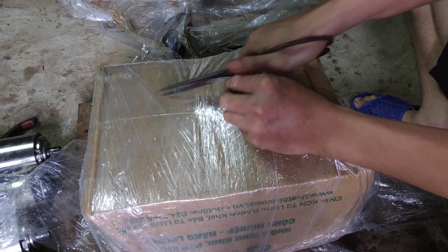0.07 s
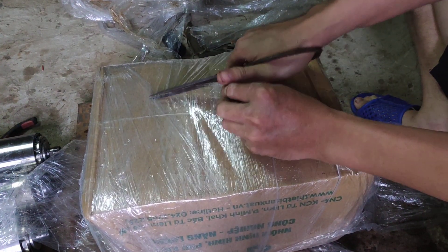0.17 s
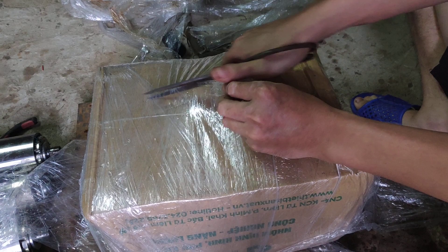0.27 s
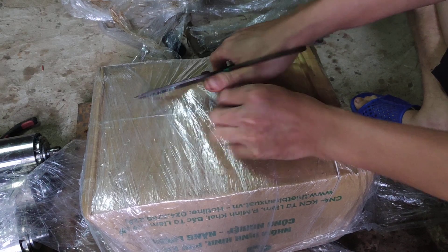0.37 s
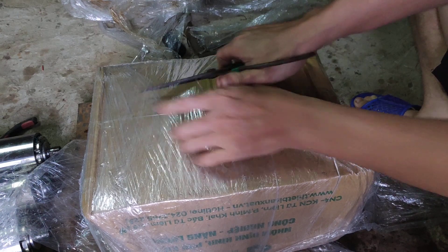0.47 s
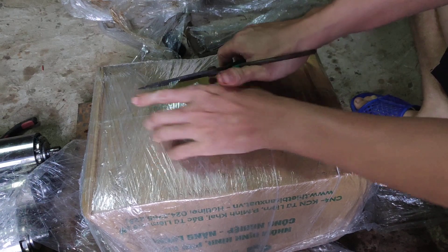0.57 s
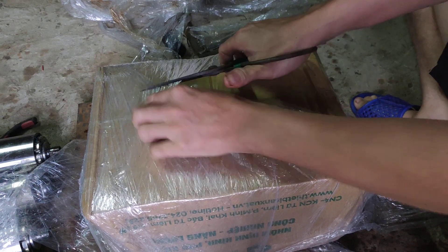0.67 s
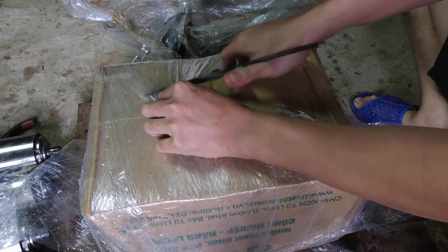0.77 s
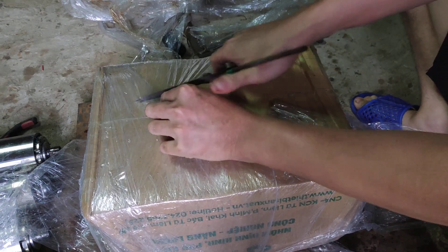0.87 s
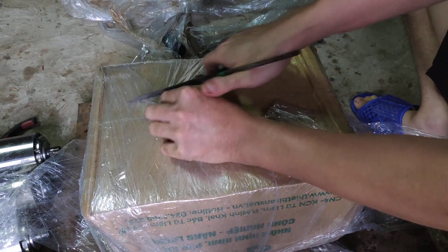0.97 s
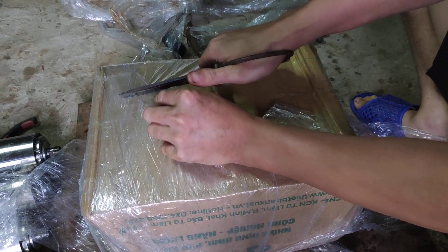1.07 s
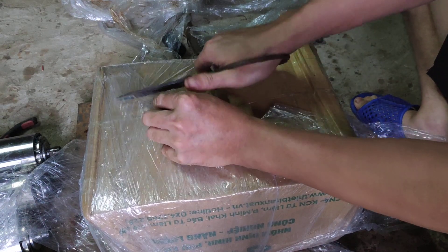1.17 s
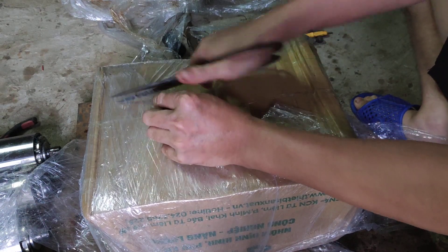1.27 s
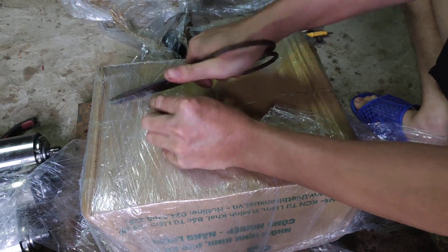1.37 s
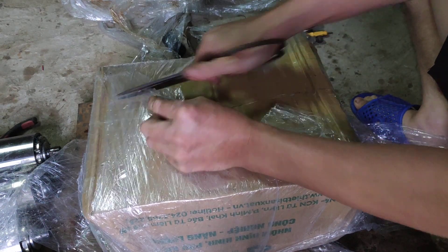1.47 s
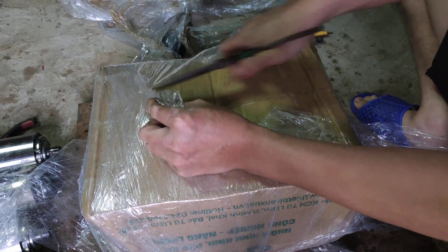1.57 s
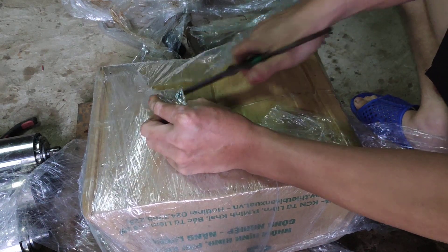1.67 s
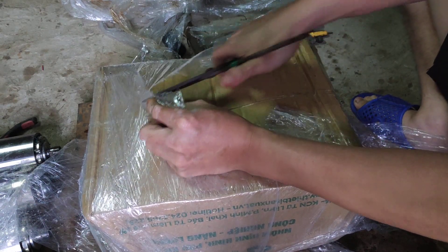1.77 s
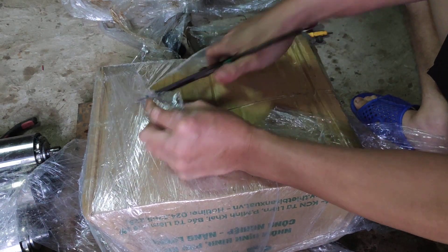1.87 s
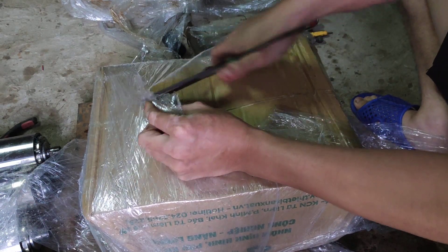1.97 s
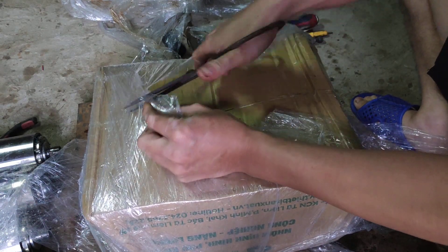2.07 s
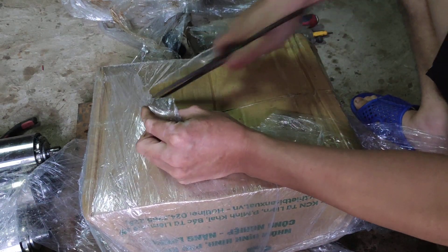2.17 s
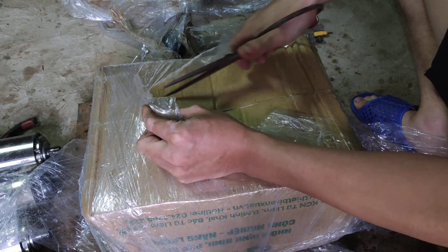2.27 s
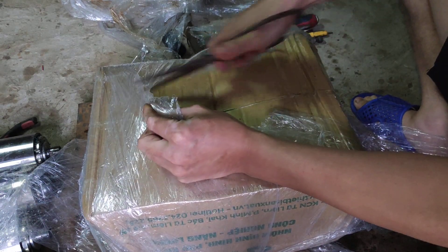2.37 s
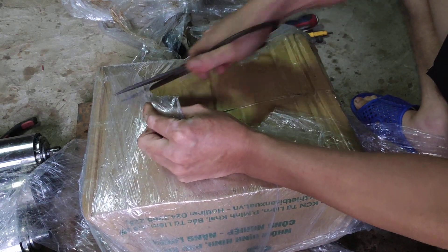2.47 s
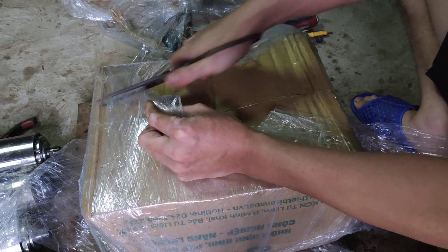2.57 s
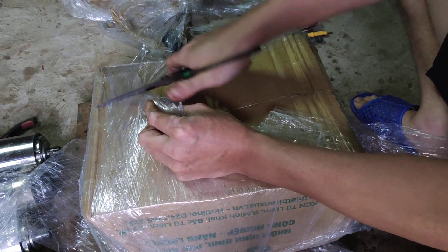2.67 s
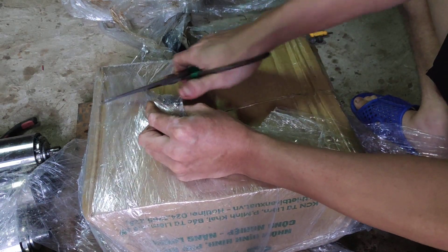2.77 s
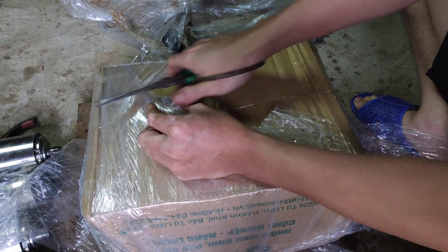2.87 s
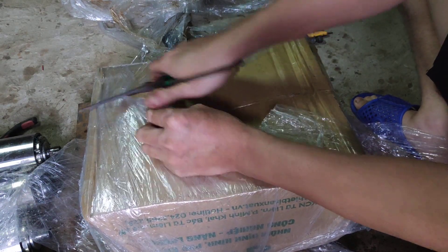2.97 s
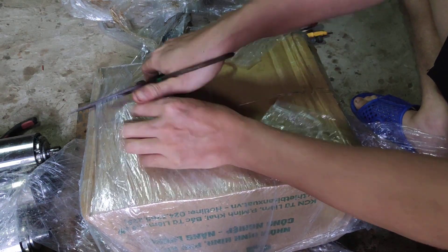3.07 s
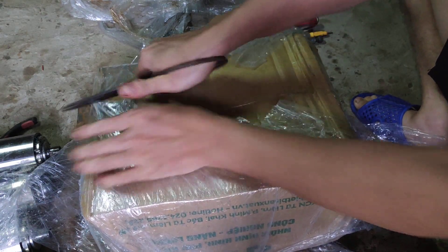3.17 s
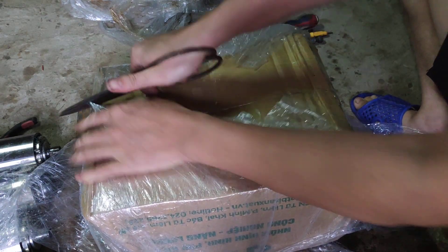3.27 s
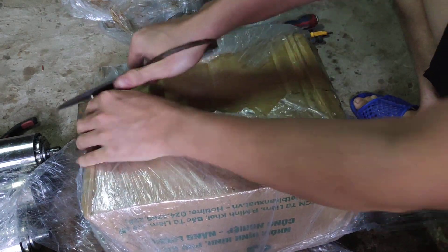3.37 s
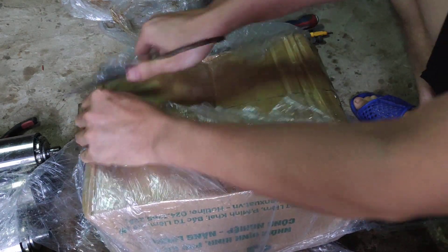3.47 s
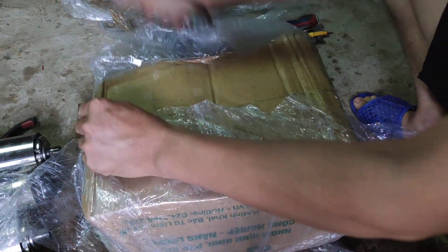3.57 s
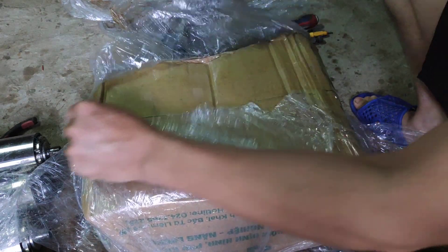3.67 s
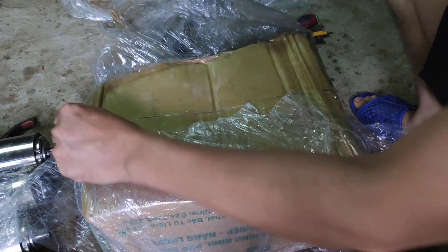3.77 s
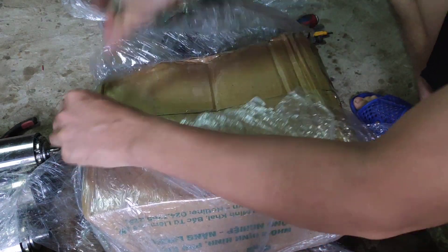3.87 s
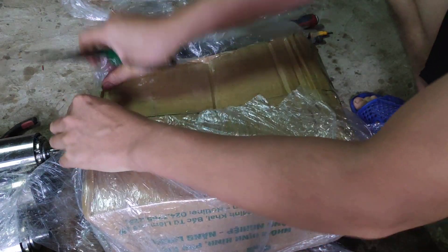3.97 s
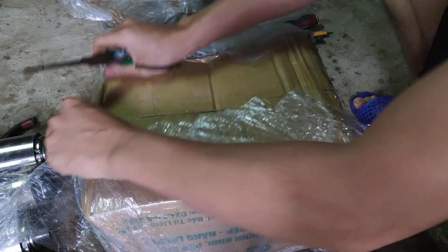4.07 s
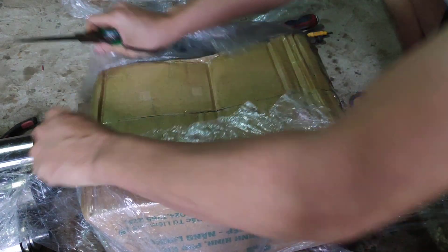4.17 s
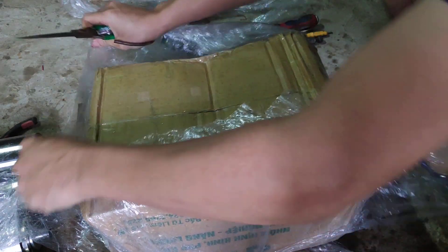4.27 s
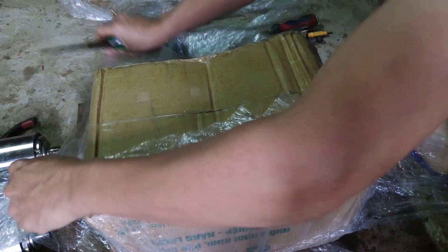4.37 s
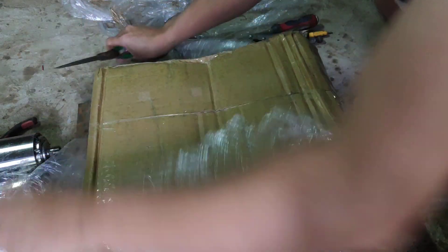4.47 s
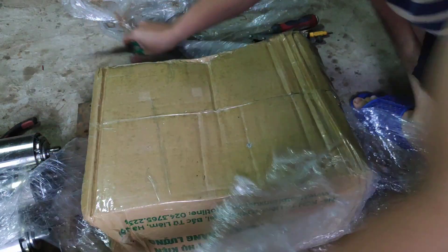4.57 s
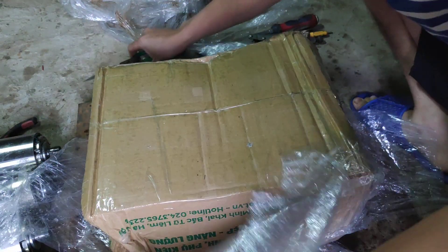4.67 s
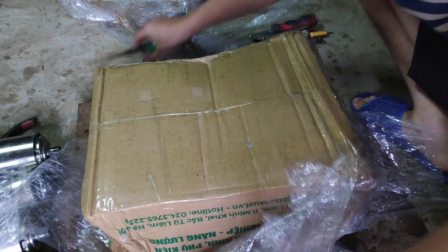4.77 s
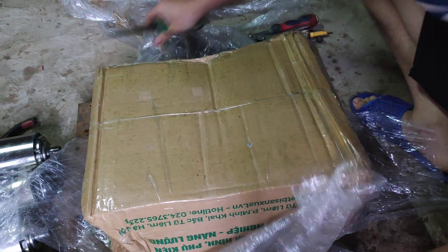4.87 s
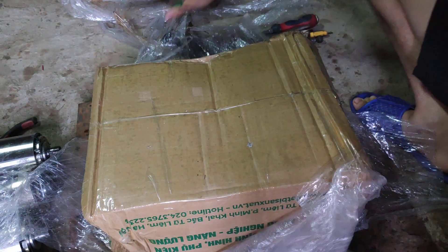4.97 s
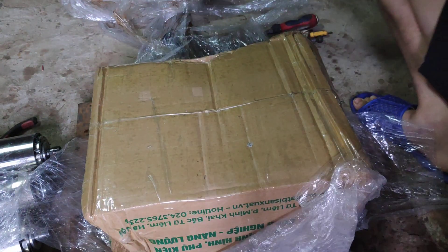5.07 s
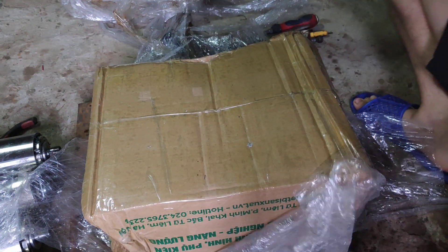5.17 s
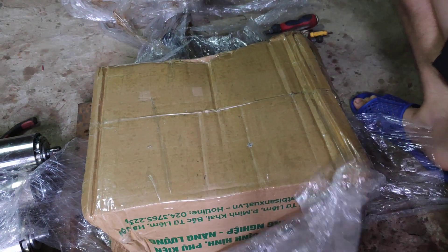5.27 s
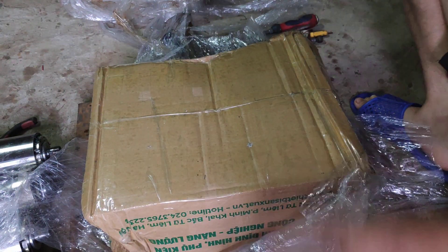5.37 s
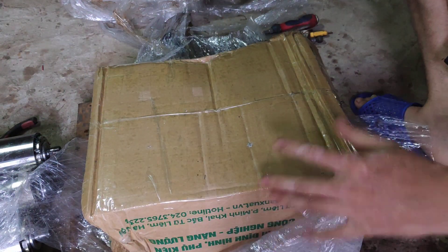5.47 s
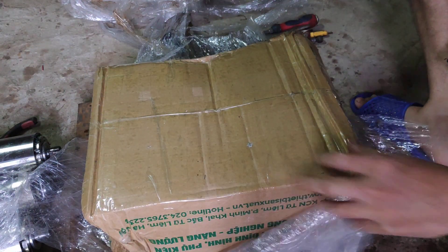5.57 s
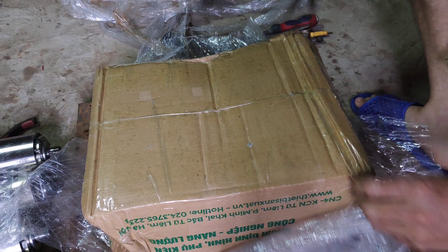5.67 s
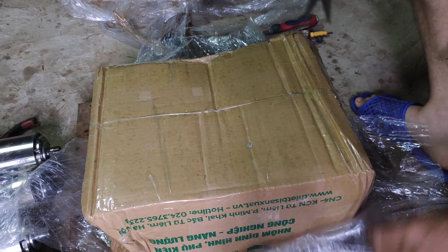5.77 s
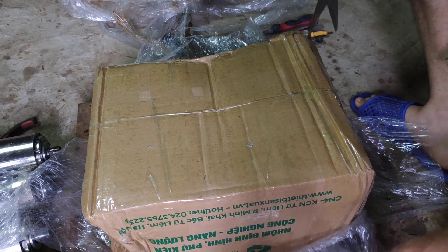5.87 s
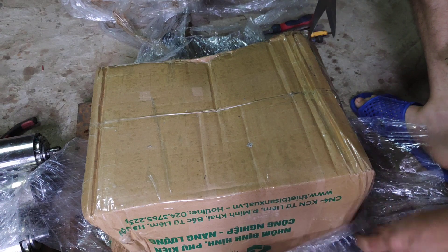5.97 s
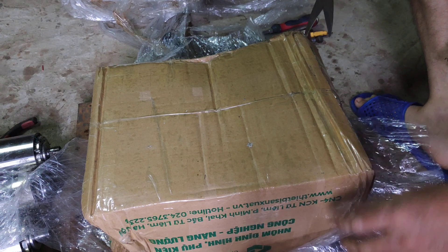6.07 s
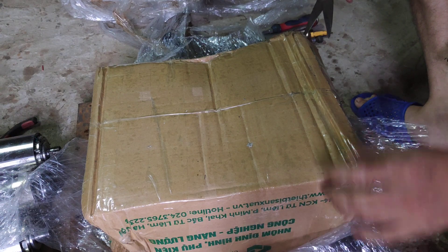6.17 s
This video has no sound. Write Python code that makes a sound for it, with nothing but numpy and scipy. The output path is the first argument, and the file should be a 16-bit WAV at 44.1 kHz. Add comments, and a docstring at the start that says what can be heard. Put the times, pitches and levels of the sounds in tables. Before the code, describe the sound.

Plastic stretch wrap crinkles and squeaks in irregular bursts close to the microphone. Scissors clack shut three times early on, the film snapping sharply where it is cut. More crackling tugs follow, with dull bumps on a cardboard box. The longest, loudest pull comes about four seconds in, then lighter rustles and snaps. A faint low workshop rumble lies underneath.

```python
"""Stretch wrap is snipped and pulled off a cardboard box on a workshop floor, close to a stereo microphone.
Over a low rumble, the film squeaks and crinkles from the start, in clumps of tiny buckling clicks.
In the first two seconds the scissors knock shut three times and the film snaps where it is cut.
More strokes follow, sounding the taut film and the box; hands and scissors bump the cardboard.
The longest, loudest pull comes at four seconds, then lighter ones. Each microphone port rings in the treble.
"""
import sys
import numpy as np
from scipy import signal
from scipy.fft import rfft, irfft, next_fast_len
from scipy.io import wavfile
from scipy.ndimage import uniform_filter1d, map_coordinates

SR = 44100
rng = np.random.default_rng(int(sys.argv[2]) if len(sys.argv) > 2 else 0)


def transcribe(u):
    """Save the signal u as a 16-bit wav file named by the first command-line argument.

    u: samples, shape (n,) or (channels, n), limited to [-1, 1]; the rate is SR.
    q: integer samples, one column per channel.
    """
    v = np.clip(np.atleast_2d(u).T, -1, 1)
    q = np.round(v * 32767).astype(np.int16)
    wavfile.write(sys.argv[1], SR, q)


N = 274504
LEAD = SR // 100  # samples of space ahead of each click


def amp(db):
    """Decibels to gain."""
    return 10 ** (np.asarray(db) / 20)


def unit(x):
    """Scale to rms 1."""
    return x / np.sqrt(np.mean(x ** 2) + 1e-20)


def along(points, hz):
    """Read (Hz, value) points on a log frequency axis."""
    freqs, values = np.transpose(points)
    return np.interp(np.log(hz + 1), np.log(freqs + 1), values)


def wobble(rate):
    """A smooth random curve through `rate` points a second."""
    points = rng.standard_normal(int(N * rate / SR) + 4)
    return map_coordinates(points, [np.arange(N) * rate / SR])


def coloured(x, points, size=8192):
    """Minimum-phase filter with the given (Hz, dB) gain."""
    cepstrum = irfft(np.log(amp(along(points, np.fft.rfftfreq(size, 1 / SR)))))
    cepstrum[1:size // 2] *= 2
    cepstrum[size // 2 + 1:] = 0
    response = irfft(np.exp(rfft(cepstrum)))
    return signal.oaconvolve(x, response.reshape((1,) * (x.ndim - 1) + (-1,)), axes=-1)[..., :N]


def levelled(x, width_hz=550):
    """Flatten a short sound's broad spectrum to gain 1; its fine ripple and timing stay."""
    size = next_fast_len(x.shape[-1])
    spectrum = rfft(x, size)
    bins = max(int(width_hz * size / SR), 3)
    power = uniform_filter1d(uniform_filter1d(np.abs(spectrum) ** 2, bins), bins)
    return irfft(spectrum / np.sqrt(np.abs(power) + 1e-12), size)


# The workshop's room tone. Each row: frequency in Hz, relative level in dB.
ROOM_TONE = [(15, -14), (30, 4), (48, -1), (80, -2), (150, -11), (300, -18.5), (700, -30), (2000, -25),
             (6000, -27.5), (16000, -49)]
# A machine far from the microphone: pitch in Hz, relative level in dB.
MACHINE_HUM = (356, -71)

def workshop():
    """Steady low rumble and a distant machine's wavering hum, nearly alike at both ports."""
    air = rng.standard_normal(N) + .17 * rng.standard_normal((2, N))
    hz, db = MACHINE_HUM
    hum = amp(db + 2 + 1.1 * wobble(5.34)) * np.sin(2 * np.pi * hz * np.arange(N) / SR)
    return amp(-53) * unit(coloured(air, ROOM_TONE)) + hum


# The workshop's reverberation. Each row: frequency in Hz, seconds to fall by 60 dB.
ROOM_DECAY = [(150, 0.065), (1500, 0.31), (8000, 0.17), (16000, 0.19)]

def path_to_mic(near_db, room_db, bounces=14):
    """Stereo response from one spot of the film: direct sound, nearby surfaces, workshop tail."""
    hz, t, noise = signal.stft(rng.standard_normal((2, SR // 5)), SR, nperseg=256)
    decay = amp(-60 * t / along(ROOM_DECAY, hz)[:, None])
    tail = signal.istft(noise * decay, SR, nperseg=256)[1]
    response = amp(room_db) * tail / np.linalg.norm(tail[0])
    left_lag = rng.integers(2, 8)  # the film lies a little nearer the right port
    response[0, left_lag] += 1
    response[1, 0] += 1
    for delay, angle, sign in rng.random((bounces, 3)):
        bounce = amp(near_db) * np.sign(sign - .5) / np.sqrt(bounces)
        at = int((.0005 + .009 * delay ** 2) * SR)
        response[0, at + int(.0006 * angle * SR)] += bounce
        response[1, at + int(.0005 * (1 - angle) * SR)] += bounce
    return response


# Film and hands sliding on blade and cardboard, close up.
# Each row: start in seconds, length in seconds, relative level in dB, pitch in Hz.
SLIDES = [(0.0, 0.053, -46, 3170), (0.619, 0.04, -43, 3350), (0.688, 0.09, -49, 3180),
          (1.34, 0.018, -45, 1540), (3.54, 0.14, -49.5, 497), (3.663, 0.14, -55.5, 525),
          (4.129, 0.044, -46.5, 513), (4.188, 0.23, -49.5, 622), (5.556, 0.089, -54.5, 236)]

def squeaks():
    """Stick-slip gives a short rough squeak or groan whose pitch staggers."""
    out = np.zeros(N)
    for s, length, db, hz in SLIDES:
        start, n = round(s * SR), int(length * SR)
        pitch = hz * (1 + 0.1476 * wobble(0.36 * hz)[:n])
        tone = np.sin(2 * np.pi * np.cumsum(pitch) / SR)
        out[start:start + n] += amp(db + 9) * np.hanning(n) * tone
    return signal.oaconvolve(out[None], path_to_mic(near_db=-13, room_db=-20), axes=1)[:, :N]


# The hand's grip between strokes.
# Each row: time in seconds, crinkle level and box rubbing level, both in relative dB.
HAND_GRIP = [(0.0, -38.5, -51), (0.9, -42.5, -59.5), (1.25, -42.5, -52.5), (2.45, -44, -57.5),
             (2.72, -46.5, -52.5), (3.3, -41, -51), (4.9, -40, -57.5), (5.45, -53, -59.5),
             (6.22, -48, -61.5)]
# Strokes of hand and blade through the film. Each row: start, rise and hold in seconds,
# relative crinkle level in dB, then the offsets from it of taut film and box rubbing in dB.
HAND_STROKES = [(0.036, 0.011, 0.077, -34.5, -5, -22), (0.385, 0.033, 0.012, -37, -10.5, -23),
                (0.457, 0.063, 0.01, -34, -9, -14.5), (0.566, 0.058, 0.2, -33, -19, -23),
                (0.975, .035, 0.044, -29.5, -11, -17), (1.278, 0.036, .02, -35, -10, -15),
                (1.432, 0.088, 0.056, -30.5, -10, -18), (1.844, 0.08, 0.04, -27.5, -3, -22),
                (1.98, 0.056, 0.034, -37.5, -3, -16), (2.109, 0.038, 0.014, -36.5, -3, -16),
                (2.537, 0.03, 0.016, -38, -15, -10.5), (2.755, 0.01, 0.013, -38, -13, -9.5),
                (2.86, 0.084, 0.076, -30, -16, -19), (3.042, 0.05, 0.067, -29.5, -15, -15.5),
                (3.388, 0.02, 0.044, -32.5, -18, -16), (3.469, 0.027, .15, -27, -15.5, -16.5),
                (3.67, .028, 0.02, -30, -13, -27), (3.806, 0.019, .03, -37, -18, -31),
                (3.999, 0.2, 0.32, -19, -18, -20.5), (4.51, 0.047, 0.017, -19.5, -12.5, -15.5),
                (4.772, 0.06, 0.066, -40.5, -7, -17), (4.882, 0.092, 0.032, -26.5, -13, -20),
                (5.045, 0.02, .02, -37.5, -13, -19), (5.152, 0.031, 0.061, -38, -14, -24),
                (5.498, 0.14, 0.046, -31, -10, -15.5), (5.763, 0.031, 0.019, -27.5, -16.5, -20.5)]

def effort():
    """Drive in dB for crinkle, taut film and box: each stroke rises, sags, lets go and settles."""
    sag_db_per_s, release_db_per_s = 10.5, 123  # the film yields under pull, quiets as the hand stops
    settle_db, settle_db_per_s = -13.5, 30  # crumpled film goes on unfolding
    t = np.arange(N) / SR
    times, *levels = np.transpose(HAND_GRIP)
    grip_db, rub_db = [np.interp(t, times, level) for level in levels]
    taut_db = grip_db - 15.5
    power = amp([grip_db, taut_db, rub_db]) ** 2
    for s, rise, hold, db, sheet_db, box_db in HAND_STROKES:
        span = slice(round(s * SR), round(s * SR) + SR)
        age = np.maximum(t[span] - s, 0)
        held = np.clip(age - rise, 0, hold)
        after = np.maximum(age - rise - hold, 0)
        pull = np.minimum(age / rise, 1) ** 1.3 * amp(db - sag_db_per_s * held)
        release = np.maximum(amp(-release_db_per_s * after), amp(settle_db - settle_db_per_s * after))
        power[:, span] += np.outer(amp([0, sheet_db, box_db]), pull * release) ** 2
    return 10 * np.log10(power)


def clicks(rate, scatter_db, clumps):
    """Random buckling impulses of uneven size, with rms near 1 over any short stretch."""
    fires = rng.random(N) < rate / SR
    size = amp(scatter_db * rng.standard_normal(N)) * clumps
    size = np.minimum(size, amp(15.5))  # a crease stores only so much energy
    impulses = fires * np.sign(rng.standard_normal(N)) * size
    window = int(.04 * SR)
    power = np.abs(uniform_filter1d(uniform_filter1d(impulses ** 2, window), window))
    return impulses / np.sqrt(power + 1e-9)


def spread(x, near_db, room_db, size=2048):
    """Clicks wander over the film: overlapping stretches each take their own path to the microphone."""
    spot = (np.arange(N) / size + rng.random(N)).astype(int)
    out = np.zeros((2, N + SR))
    for k in range(spot.max() + 1):
        start, end = max(k - 1, 0) * size, (k + 1) * size
        response = levelled(np.pad(path_to_mic(near_db, room_db), ((0, 0), (LEAD, 0))))
        stretch = x[start:end] * (spot[start:end] == k)
        heard = signal.fftconvolve(stretch[None], response, axes=1)
        out[:, start:start + heard.shape[1]] += heard
    return out[:, LEAD:LEAD + N]


# Creasing film, taut film and cardboard at close range. Each row: frequency in Hz, gain in dB.
CRINKLE_COLOUR = [(300, -19), (900, -4), (2000, -8.5), (3500, 3), (6000, 4), (10000, 0.5), (16000, 0.5)]
SHEET_COLOUR = [(300, -29), (780, -9.5), (1200, -2), (1600, -2), (2150, -3.5), (2700, -4.5), (3200, -5.5),
                (3900, -14), (6000, -8), (12000, -38)]
BOX_COLOUR = [(40, -20.5), (110, -6), (210, -0.5), (300, -1), (400, 0.5), (540, -3), (750, -3), (1100, -12),
              (3000, -40.5)]

def crinkling(crinkle_db, sheet_db, box_db):
    """Creases buckle in avalanches, denser as the pull grows; slips rub the box; both shake the sheet."""
    creases_per_s = 4000 * amp(.55 * (crinkle_db + 32.5))
    clumps = amp(3.4 * wobble(450) + 0.97 * wobble(90))
    creases = clicks(creases_per_s, scatter_db=3.5, clumps=clumps)
    slips = clicks(4000, scatter_db=1, clumps=clumps)
    shaking = 0.6 * creases + 0.72 * slips
    crinkle = spread(creases * amp(crinkle_db - 8), near_db=-1, room_db=-0.5)
    sheet = spread(shaking * amp(sheet_db + 9.5), near_db=2, room_db=-8, size=4096)
    box = spread(slips * amp(box_db + 13), near_db=-7, room_db=-8.5, size=8192)
    return coloured(crinkle, CRINKLE_COLOUR) + coloured(sheet, SHEET_COLOUR) + coloured(box, BOX_COLOUR)


# The film's loud snaps, close to the microphone. Each row: time in seconds,
# crack level and sheet pop level in relative dB, treble tilt in dB per octave.
LOUD_SNAPS = [(0.0183, -24, -39, 4), (0.0628, -11.5, -22, -3), (0.0674, -31, -27, 0),
              (0.1719, -21, -47, -3.5), (0.2845, -26, -59, 2), (0.424, -25, -41.5, 4),
              (0.496, -26.5, -40, -4), (0.6091, -23, -44, -3), (0.6765, -21.5, -58, 5),
              (0.719, -20, -60, 4), (0.9745, -11.5, -36, 5), (1.0215, -36, -30.5, -5),
              (1.1954, -20, -57, -1.5), (1.2468, -20.5, -56, 0), (1.3046, -20, -36.5, 8),
              (1.378, -19.5, -43, 3), (1.4766, -21.5, -42, -6), (1.5289, -14.5, -26, 2),
              (1.5769, -21.5, -35, 9), (1.8578, -23, -38, 0), (1.8617, -10, -18.5, 4),
              (2.4793, -30, -62, -4), (2.7228, -27, -47, -7), (2.8042, -26.5, -46, 0),
              (2.9179, -11.5, -52, -7.5), (2.9937, -23, -34.5, 3), (3.112, -10, -31, -1.5),
              (3.3674, -24.5, -53, -3), (3.4176, -30, -41, -5), (3.5526, -6, -26.5, 3),
              (3.6539, -26, -33, 2), (4.141, -12, -30.5, 5), (4.1756, -12, -42, 5), (4.198, -16, -38, 7),
              (4.3092, -10, -38, -7), (4.526, -8, -35, -8), (4.5552, -15, -30, -13), (4.587, -14, -23, 0.5),
              (5.0256, -14, -48, -4), (5.1105, -23.5, -56, 2), (5.6753, -21, -45, -8),
              (5.7839, -24, -56, -8), (5.7937, -17, -55, 6), (5.8028, -13.5, -29.5, -4.5),
              (5.8428, -13, -50, -4.5), (5.9315, -23, -57, -3)]

def snaps(rows):
    """A snap: a faint noise swells just ahead of a crack, a brief rip and a low pop."""
    out = np.zeros((2, N + SR))
    t = np.arange(-LEAD, LEAD) / SR
    hz = np.geomspace(100, 16000, 48)
    octaves = np.log2(np.maximum(hz, 4000) / 8000)
    lead_in = 0.038 * amp(60 * t / 0.011) * (t < 0)
    ripping = 0.37 * amp(-60 * np.abs(t) / 0.0048) * (t >= 0)
    for s, crack_db, pop_db, tilt_db in rows:
        rip = rng.standard_normal(len(t)) * (lead_in + ripping)
        rip[LEAD] = 1  # the instant of the crack
        heard = levelled(signal.fftconvolve(rip[None], path_to_mic(near_db=-11, room_db=-11), axes=1))
        crack = amp(crack_db + 9.5 + along(CRINKLE_COLOUR, hz) + tilt_db * octaves)
        pop = amp(pop_db + 33 + along(SHEET_COLOUR, hz))
        snap = coloured(heard, np.c_[hz, 20 * np.log10(np.hypot(crack, pop))])
        start = round(s * SR)
        out[:, start:start + snap.shape[1]] += snap
    return out[:, LEAD:LEAD + N]


def stray_snaps(crinkle_db, sheet_db, count=16):
    """Thin strands part at random moments, as loud as the pull on them."""
    at = (rng.random(count) * (N - 1)).astype(int)
    crack_scatter, pop_scatter, tilt_scatter = rng.standard_normal((count, 3)).T
    crack_db = crinkle_db[at] + 3 + crack_scatter
    pop_db = sheet_db[at] + 0.5 + pop_scatter
    return snaps(np.c_[at / SR, crack_db, pop_db, 4.5 * tilt_scatter])


# The scissors closing near the microphone. Each row: start in seconds, relative level in dB, pitch in Hz.
SCISSOR_CUTS = [(0.063, -16.5, 1114), (1.529, -17.5, 1106), (1.8617, -18, 1180)]

def scissor_knocks(t60_s=0.013, attack_s=0.00028):
    """The meeting blades give a hollow knock: one short, quickly damped ring."""
    out = np.zeros(N + SR)
    t = np.arange(SR // 10) / SR
    ring = amp(-60 * t / t60_s) * (1 - np.exp(-t / attack_s))
    for s, db, hz in SCISSOR_CUTS:
        start = round(s * SR)
        out[start:start + len(t)] += amp(db) * ring * np.sin(2 * np.pi * hz * t)
    return signal.oaconvolve(out[None, :N], path_to_mic(near_db=-11, room_db=-9.5), axes=1)[:, :N]


# Hands and scissors bumping the box, dry and centred.
# Each row: start in seconds, relative level in dB, pitch in Hz.
BOX_BUMPS = [(0.146, -39.5, 136), (0.36, -41, 105), (0.972, -35, 335), (1.044, -39, 200), (1.709, -33, 202),
             (1.717, -35, 122), (2.269, -39.5, 156), (2.59, -38, 149), (2.773, -31.5, 346),
             (2.916, -28.5, 464), (3.149, -29.5, 340), (3.353, -36.5, 80), (3.44, -41, 64.7),
             (3.552, -21, 475), (4.276, -25, 218), (4.584, -25.5, 366)]

def box_bumps():
    """A cardboard panel gives a dead thud of a few cycles with a short scuff."""
    thuds, scuffs = np.zeros((2, N + SR))
    t = np.arange(SR // 5) / SR
    for s, db, hz in BOX_BUMPS:
        span = slice(round(s * SR), round(s * SR) + len(t))
        cycles = hz * t
        envelope = amp(db - 2.5 - 60 * cycles / 16) * (1 - np.exp(-cycles / 0.25))
        thuds[span] += envelope * np.sin(2 * np.pi * cycles)
        scuffs[span] += amp(db + 8 - 60 * t / 0.021) * rng.standard_normal(len(t))
    return thuds[:N] + coloured(scuffs[:N], BOX_COLOUR)


def scene():
    """Film, scissors, box and room as they reach the microphone."""
    crinkle_db, sheet_db, box_db = effort()
    film = crinkling(crinkle_db, sheet_db, box_db) + snaps(LOUD_SNAPS) + stray_snaps(crinkle_db, sheet_db)
    return film + squeaks() + scissor_knocks() + box_bumps() + workshop()


# Each microphone port has its own sharp treble resonance. Each row: frequency in Hz, gain in dB.
LEFT_RESONANCE = [(3000, 1.5), (4500, 1), (6200, 2), (8000, 10.5), (8700, 17), (9400, 22), (10000, 17.5),
                  (10800, 12), (12300, 7.5), (15500, 4)]
RIGHT_RESONANCE = [(3000, 1), (4500, 1), (5900, 3.5), (6800, 12), (7550, 17), (8200, 13.5), (9100, 3.5),
                   (10400, 6.5), (12300, -2), (15500, 3)]

def record(dry):
    """The ports ring in the treble, the loudest snaps are rounded off, and the band ends steeply."""
    ceiling, top_hz = .88, 15800
    ports = np.array([coloured(dry[0], LEFT_RESONANCE), coloured(dry[1], RIGHT_RESONANCE)])
    rounded = ports / (1 + (ports / ceiling) ** 6) ** (1 / 6)
    size = next_fast_len(N + SR // 2)
    passband = np.fft.rfftfreq(size, 1 / SR) < top_hz
    return irfft(rfft(rounded, size) * passband, size)[:, :N]


dry = scene()
out = record(dry)
transcribe(out)
```